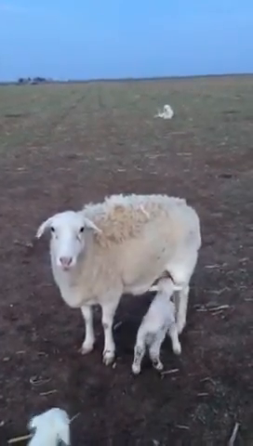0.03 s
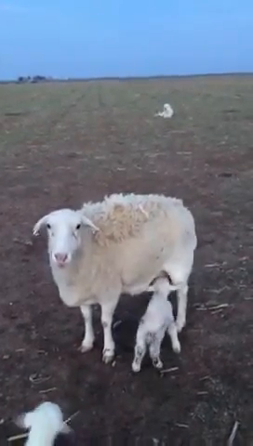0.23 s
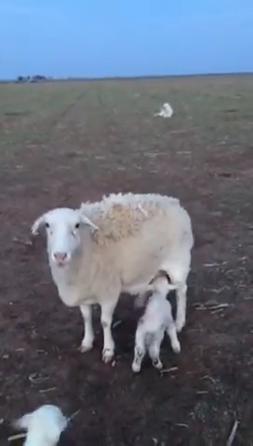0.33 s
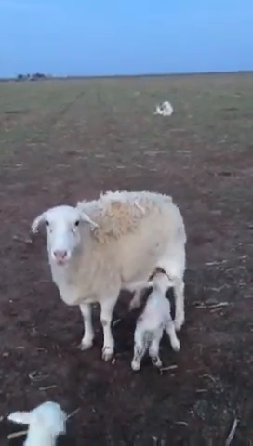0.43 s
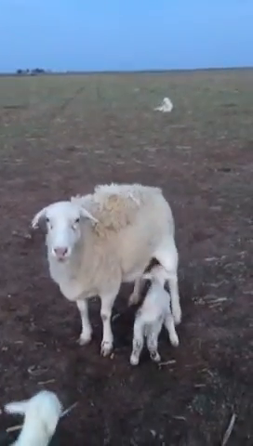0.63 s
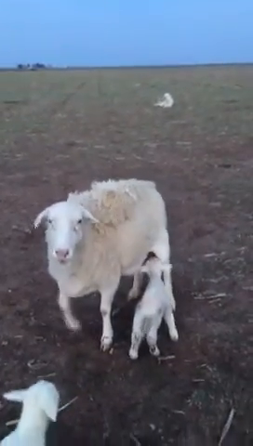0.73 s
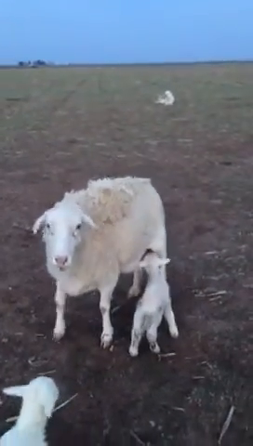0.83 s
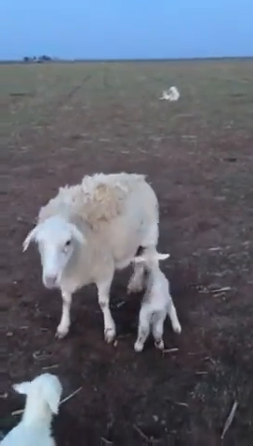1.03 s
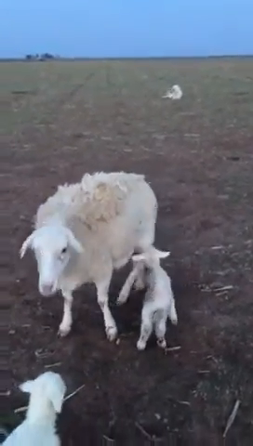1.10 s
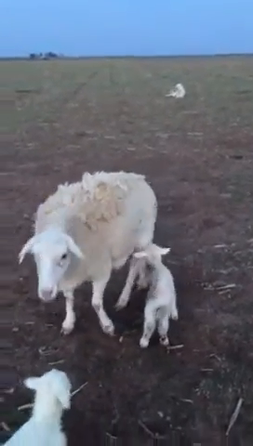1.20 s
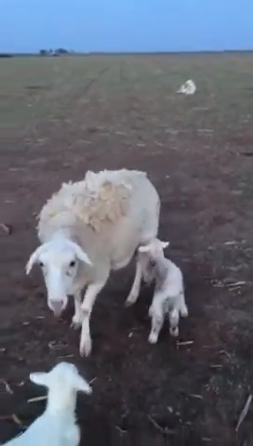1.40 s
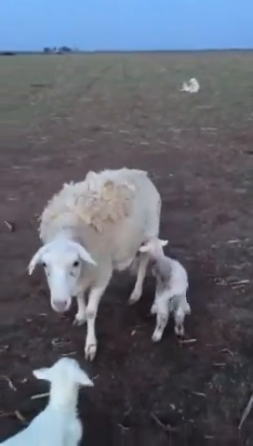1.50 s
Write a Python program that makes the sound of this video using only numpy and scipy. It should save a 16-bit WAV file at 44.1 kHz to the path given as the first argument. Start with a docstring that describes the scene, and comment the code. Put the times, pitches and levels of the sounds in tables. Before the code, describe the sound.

A lamb bleats once, short catches of voice running into a hoarse, quavering cry. Soft thumps sound close to the microphone and wind rumbles in the open field. Afterwards dry stalks tick under hooves.

```python
"""A lamb bleats once in an open field: short, clear catches of voice run into a hoarse, quavering cry.
Pulses of its vocal folds and a rasp of air excite the resonances of throat and mouth.
Wind rumbles as shaped noise over a steady low hum, and soft thumps swell in low modes close by.
Under the hooves dry stalks crack and ring in damped modes, and the soil is scuffed."""
import sys
import numpy as np
from scipy import signal
from scipy.fft import rfft, irfft
from scipy.io import wavfile

SR = 44100
rng = np.random.default_rng(int(sys.argv[2]) if len(sys.argv) > 2 else 0)


def materialize(psi):
    """Save the field psi as 16-bit PCM at rate SR to the path in sys.argv[1].

    A 1-D psi becomes a single channel; in a 2-D psi each row is a channel.
    """
    bounded = np.clip(np.atleast_2d(psi).T, -1, 1)
    quanta = np.round(bounded * 32767).astype(np.int16)
    wavfile.write(sys.argv[1], SR, quanta)


N = 68355
TIME = np.arange(N) / SR


def from_db(db):
    """The decibel scale: 20 dB is a factor of ten in amplitude."""
    return 10 ** (np.asarray(db) / 20)


def rms_one(x):
    """Normalisation to unit mean power."""
    return x / np.sqrt(np.mean(x ** 2) + 1e-20)


def envelope(points):
    """Exponential growth and decay: a gain running straight in dB between (time_s, level_db) points."""
    return from_db(np.interp(TIME, *np.transpose(points)))


def coloured(points):
    """Spectral shaping: white noise weighted by (frequency_hz, density_db) points, at unit rms."""
    hz, db = np.transpose(points)
    bins_hz = np.maximum(np.arange(N // 2 + 1) * SR / N, 1)
    gain = from_db(np.interp(np.log(bins_hz), np.log(hz), db))
    return rms_one(irfft(rfft(rng.standard_normal(N)) * gain, N))


def drift(rate_hz):
    """Random modulation: noise low-passed at rate_hz, at unit rms."""
    bins_hz = np.arange(N // 2 + 1) * SR / N
    return rms_one(irfft(rfft(rng.standard_normal(N)) / (1 + (bins_hz / rate_hz) ** 2), N))


# spectra of the wind, the field's low and high wash, and hiss: frequency_hz, density_db
WIND_SPECTRUM = [(25, -46), (50, -70), (70, -17.5), (100, -6), (130, 1), (160, -0.5), (200, 1.5),
                 (250, -6.5), (320, -12), (420, -23), (600, -27), (1000, -52), (5000, -86)]
LOW_WASH_SPECTRUM = [(200, -9), (400, -1.5), (750, 2), (1100, -2.5), (1500, -10.5), (2500, -27.5),
                     (6000, -32), (15000, -63)]
HIGH_WASH_SPECTRUM = [(500, -27), (850, 0.5), (1300, 3.5), (1800, -4), (2100, -8), (2600, -25), (5000, -36),
                      (15000, -67)]
HISS_SPECTRUM = [(500, 5.5), (2500, 4), (5000, 3.5), (10000, 1), (15000, 0.5)]
# envelopes of the wind and the two washes: time_s, level_db
WIND_LEVEL = [(0, -50), (.13, -58), (.2, -53.5), (.28, -55.5), (.44, -50.5), (.51, -50.5), (.65, -53.5),
              (.73, -45), (.82, -53.5), (.91, -46), (1.05, -45.5), (1.2, -47), (1.31, -52.5), (1.44, -53),
              (1.55, -53.5)]
LOW_WASH_LEVEL = [(0, -70), (.25, -67), (.4, -63.5), (.52, -69), (.8, -67), (1.05, -67), (1.4, -61.5),
                  (1.55, -62.5)]
HIGH_WASH_LEVEL = [(0, -62.5), (.2, -63.5), (.4, -67.5), (.6, -70.5), (1.05, -65.5), (1.55, -77.5)]
def air(hiss_db=-67.5):
    """Amplitude-modulated noise: wind gusts and the far field swells and fades over a steady hiss."""
    wind = envelope(WIND_LEVEL) * coloured(WIND_SPECTRUM)
    low_wash = envelope(LOW_WASH_LEVEL) * coloured(LOW_WASH_SPECTRUM)
    high_wash = envelope(HIGH_WASH_LEVEL) * coloured(HIGH_WASH_SPECTRUM)
    return wind + low_wash + high_wash + from_db(hiss_db) * coloured(HISS_SPECTRUM)


# partials of the hum: harmonic_number, level_db
HUM_HARMONICS = [(1, -52), (2, -79.5), (3, -80.5)]
def hum(pitch_hz=122, waver_share=.0068, waver_db=-2):
    """A harmonic series on a low fundamental, wavering slightly in pitch and level."""
    phase = 2 * np.pi * np.cumsum(pitch_hz * (1 + waver_share * drift(14))) / SR
    tone = sum(np.sqrt(2) * from_db(db) * np.sin(k * phase) for k, db in HUM_HARMONICS)
    return tone * from_db(waver_db * drift(3.5))


# soft contacts: peak_s, half_length_s, level_db, pitch_hz, upper_modes_db
SOFT_CONTACTS = [(0.3243, 0.0063, -26, 196.6, -9.5), (.3308, 0.0043, -30, 303, -14),
                 (0.341, 0.013, -34, 156.6, -11), (.461, 0.0095, -51.5, 153.1, 3),
                 (.565, 0.0071, -34, 159.6, -11), (.697, 0.012, -37.5, 132.7, -17),
                 (0.9708, 0.0077, -28, 178.3, -9.5)]
# modes of each contact: frequency_ratio, gain_db, length_share
CONTACT_MODES = [(1, 0, 0.95), (2.15, 2, 0.62), (2.85, -9, 1)]
def thumps():
    """Soft contact excites low modes, which swell and die within a few cycles."""
    out = np.zeros(N)
    for peak_s, half_length_s, level_db, pitch_hz, upper_db in SOFT_CONTACTS:
        for k, (ratio, mode_db, share) in enumerate(CONTACT_MODES):
            swell = np.exp(-((TIME - peak_s) / (half_length_s * share)) ** 2)
            mode = (-1) ** k * np.sin(2 * np.pi * pitch_hz * ratio * (TIME - peak_s))
            out += from_db(level_db + mode_db + upper_db * (k > 0)) * swell * mode
    return out


def resonance(x, hz, width_hz):
    """Two identical two-pole resonators in cascade, with unit gain at the peak."""
    radius = np.exp(-np.pi * width_hz / SR)
    gain = (1 - radius ** 2) / 2
    section = [gain, 0, -gain, 1, -2 * radius * np.cos(2 * np.pi * hz / SR), radius ** 2]
    return signal.sosfilt([section] * 2, x + 1e-18)


SCATTER_HZ = 254   # bandwidth of the voice's jitter and shimmer
def larynx(phase, roughness, harmonics=24, full_shimmer_db=6):
    """The glottal source: uneven vocal-fold pulses, with a rasp of air gated by each cycle."""
    pulses = np.sqrt(2) * sum(np.cos(k * phase) for k in range(1, harmonics + 1))
    rasp = rms_one(rng.standard_normal(N) * (1 + np.cos(phase))) * np.sqrt(2 * harmonics)
    shimmer = from_db(full_shimmer_db * roughness * drift(SCATTER_HZ))
    return np.sqrt(1 - roughness ** 2) * pulses * shimmer + roughness * rasp


# surges of vocal effort: peak_s, rise_s, fall_s, top_pitch_hz, sag_share, roughness_share,
# throat_db, mouth_hz, mouth_db, bright_hz, bright_db
BLEAT_SURGES = [ (.388, .012, 0.0088, 455, .08, 0.3, -73, 3600, -92, 4960, -71.5),
                (0.474, 0.024, 0.0098, 463.5, .18, .06, -56.5, 4600, -55, 5740, -60.5),
                (.558, .012, .014, 522.7, .08, 0.2, -56, 4750, -56.5, 5930, -65),
                (.580, 0.00915, 0.01, 489.5, 0.15, 0.54, -65, 4070, -64, 5600, -66),
                (0.664, .012, .028, 484.7, .04, 0, -57, 3850, -65, 5100, -71),
                (.698, 0.0099, 0.011, 442, .15, .3, -63, 4160, -65, 6050, -66),
                (.742, 0.015, .017, 502.5, .28, .08, -58, 3275, -56, 5690, -54.5),
                (.779, .010, .012, 439.7, 0.23, 0.4, -59, 3170, -66, 5560, -66),
                (0.834, .010, 0.016, 487, .25, .14, -60.5, 3580, -55.5, 5330, -54.5),
                (.865, 0.01213, 0.014, 467.7, .18, 0.26, -68, 4100, -59, 5373, -54.5),
                (0.907, .011, 0.019, 494.8, .22, 0.06, -60.5, 3770, -52, 5393, -52.5)]
# throat resonances: centre_hz, width_hz, gain_db
THROAT_FORMANTS = [(466, 220, -5), (870, 170, -6), (1313, 630, -2), (1950, 430, -2), (2420, 560, -22.5)]
# treble resonances around bright_hz: frequency_ratio, width_hz, gain_db
BRIGHT_FORMANTS = [(.875, 380, -6), (1.002, 444, 2), (1.1, 392, -5.5), (1.2, 500, -22), (1.42, 700, -19),
                   (1.8, 2560, -29)]
# resonances of the held, hoarse cry: centre_hz, width_hz, gain_db
CRY_FORMANTS = [(853, 110, -8), (1494, 530, -1), (1980, 260, -3), (3466, 146, 1.5), (4720, 360, -2.5),
                (5410, 320, 0), (5950, 500, -3.5), (6720, 330, -6), (7550, 640, -8.5), (10750, 4000, -19)]
# envelope of that cry: time_s, level_db
CRY_LEVEL = [(.68, -85), (.725, -63), (.765, -54), (.79, -57.5), (.81, -61.5), (.825, -58), (.885, -55),
             (.927, -58), (.942, -62), (.96, -97)]
def lamb(taut_jitter=.002, slack_jitter=.016, slack_roughness=.6):
    """Source and filter: formants shape the glottal pulses; effort lifts loudness and pitch together."""
    peak_s, rise_s, fall_s, top_hz, sag = np.array(BLEAT_SURGES)[:, :5].T[:, :, None]
    surges = np.exp(-((TIME - peak_s) / np.where(TIME < peak_s, rise_s, fall_s)) ** 2)
    effort = surges.max(axis=0)
    # between surges the pitch sags and turns unsteady
    pitch_hz = np.average(top_hz * (1 - sag * (1 - surges)), axis=0, weights=surges + 1e-12)
    jitter = taut_jitter + (slack_jitter - taut_jitter) * (1 - effort)
    phase = 2 * np.pi * np.cumsum(pitch_hz * (1 + jitter * drift(SCATTER_HZ))) / SR
    out = np.zeros(N)
    for surge, row in zip(surges, BLEAT_SURGES):
        roughness, throat_db, mouth_hz, mouth_db, bright_hz, bright_db = row[5:]
        voice = surge * larynx(phase, roughness)
        for hz, width_hz, db in THROAT_FORMANTS:
            out += from_db(throat_db + db) * resonance(voice, hz, width_hz)
        out += from_db(mouth_db) * resonance(voice, mouth_hz, width_hz=480)
        for ratio, width_hz, db in BRIGHT_FORMANTS:
            out += from_db(bright_db + db) * resonance(voice, bright_hz * ratio, width_hz)
    held_voice = larynx(phase, slack_roughness * (1 - .5 * effort))
    cry = sum(from_db(db) * resonance(held_voice, hz, width_hz) for hz, width_hz, db in CRY_FORMANTS)
    return out + envelope(CRY_LEVEL) * rms_one(cry)


# ticks of dry stalks: start_s, level_db, pitch_hz, crack_and_side_modes_db
STALK_TICKS = [(0.9812, -46.5, 2710, 1.5), (1.0124, -58, 2450, -1), (1.0884, -53.5, 2370, 13),
               (1.0971, -43.5, 2560, -1), (1.1822, -54, 2790, 5), (1.2654, -35.5, 2316, 0.5),
               (1.2734, -47.5, 2385, 1)]
# modes of a stalk: frequency_ratio, gain_db, t60_s
STALK_MODES = [(0.986, 0, 0.018), (0.233, -18, 0.033), (0.49, -8.5, 0.028), (.74, -15, 0.021),
               (1.49, -11, 0.0053), (2.68, -17, 0.017)]
# spectrum of its crack: frequency_hz, density_db
CRACK_SPECTRUM = [(500, 1), (2000, -7), (4000, -5), (6500, -15), (9000, -10), (15000, -19)]
def stalks(attack_s=.00032, crack_db=-6.5, crack_decay_s=.00063):
    """Damped free vibration: each dry stalk gives a tiny crack and rings briefly in its modes."""
    out = np.zeros(N)
    for start_s, level_db, pitch_hz, side_db in STALK_TICKS:
        age_s = np.maximum(TIME - start_s, 0)
        ring = np.zeros(N)
        for k, (ratio, mode_db, t60_s) in enumerate(STALK_MODES):
            mode = np.exp(-np.log(1000) * age_s / t60_s) * np.sin(2 * np.pi * pitch_hz * ratio * age_s)
            ring += from_db(mode_db + side_db * (k > 0)) * mode
        crack = from_db(crack_db + side_db) * coloured(CRACK_SPECTRUM) * np.exp(-age_s / crack_decay_s)
        onset = 1 - np.exp(-age_s / attack_s)
        out += from_db(level_db) * (ring + crack) * onset
    return out


# spectrum of a hoof rubbing soil: frequency_hz, density_db
SCUFF_SPECTRUM = [(120, -12), (280, 12.5), (500, -3.5), (1200, 1.5), (1900, -17), (3500, -9), (5000, -21),
                  (9000, -26)]
def hoof_scuff(peak_s=1.447, half_length_s=.027, level_db=-55.5, flutter_db=2.2):
    """Friction noise: a hoof scuffs the soil in one short, uneven stroke."""
    stroke = np.exp(-((TIME - peak_s) / half_length_s) ** 2)
    return stroke * from_db(level_db + flutter_db * drift(150)) * coloured(SCUFF_SPECTRUM)


def scene():
    """Superposition in a free field: the sources add in one channel, without reflections."""
    return (air() + hum() + thumps() + lamb() + stalks() + hoof_scuff())[None]


def record(dry, low_cut_hz=21.7, high_cut_hz=15300):
    """Band limiting: the deep bass is rolled off gently and the top is cut steeply."""
    high_pass = signal.butter(1, low_cut_hz, "high", fs=SR, output="sos")
    low_pass = signal.ellip(10, .1, 70, high_cut_hz, fs=SR, output="sos")
    return signal.sosfilt(low_pass, signal.sosfilt(high_pass, dry))


dry = scene()
out = record(dry)
materialize(out)
```